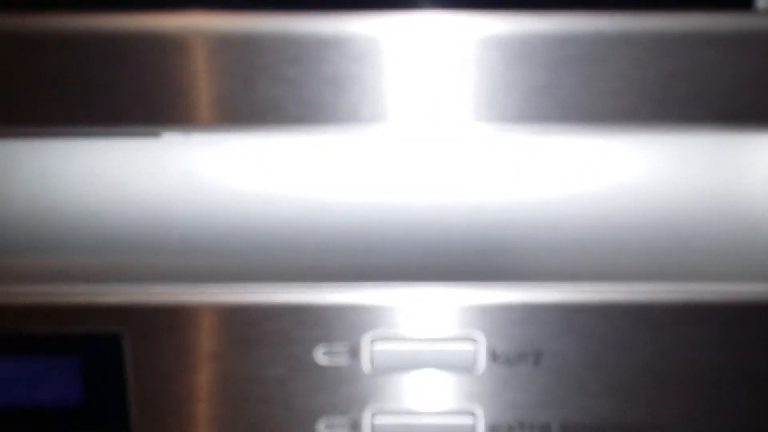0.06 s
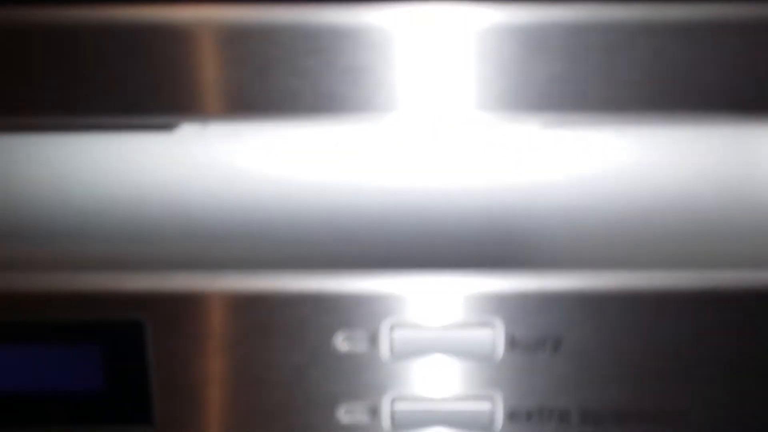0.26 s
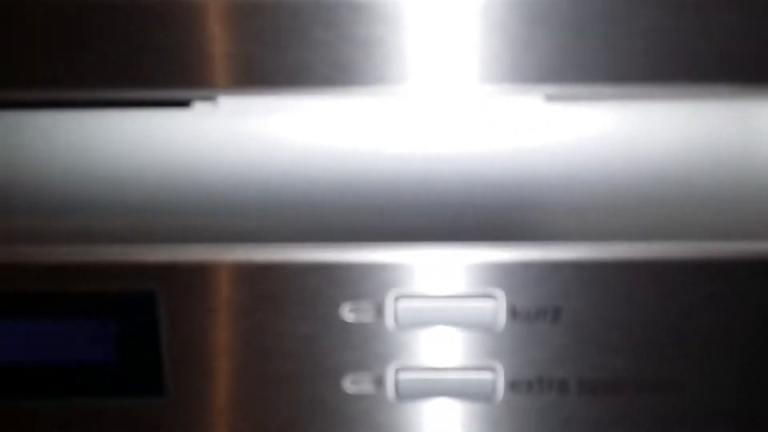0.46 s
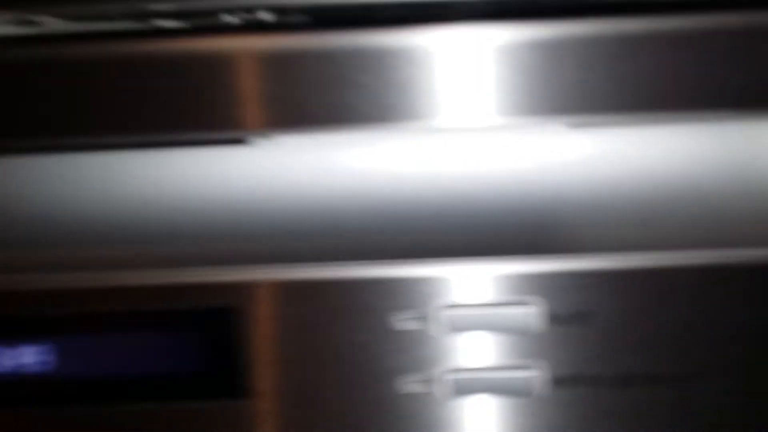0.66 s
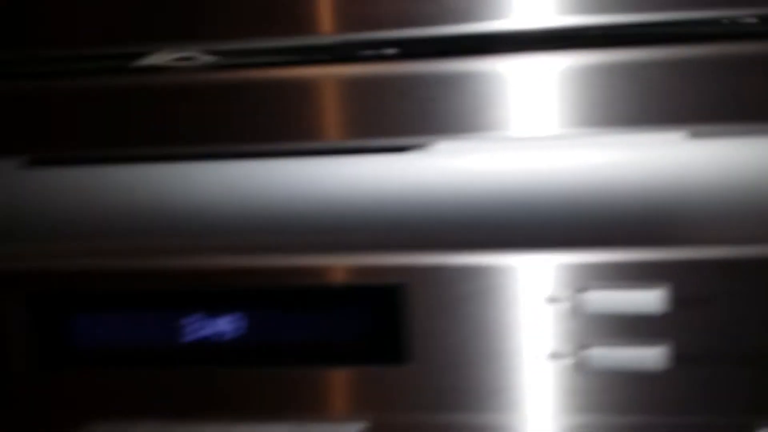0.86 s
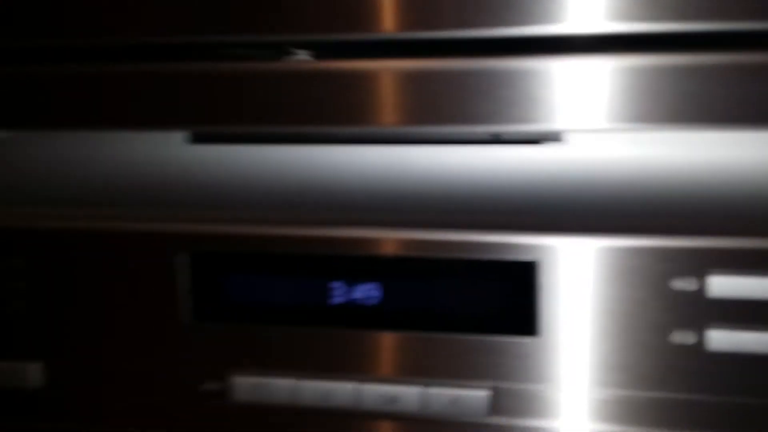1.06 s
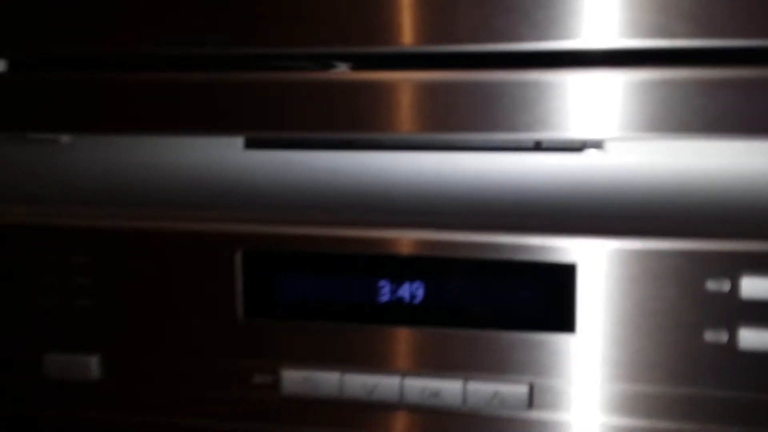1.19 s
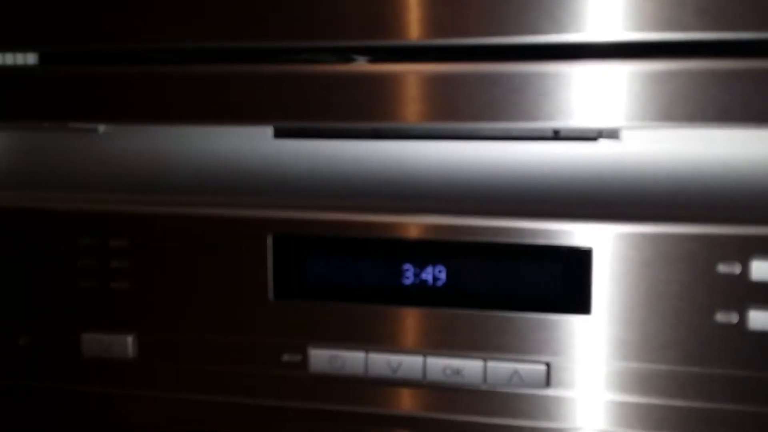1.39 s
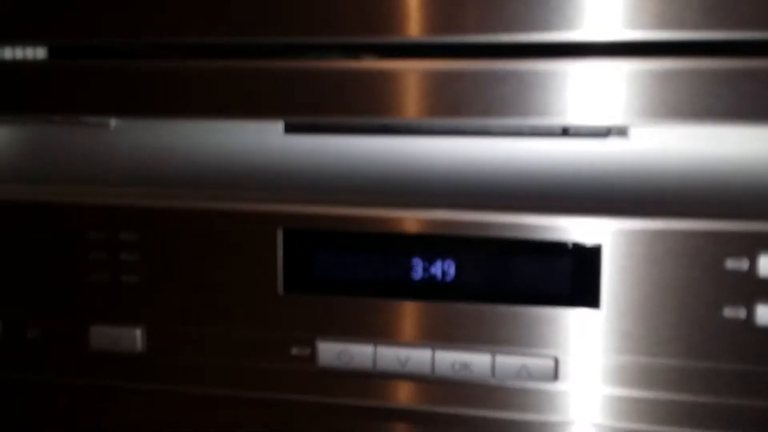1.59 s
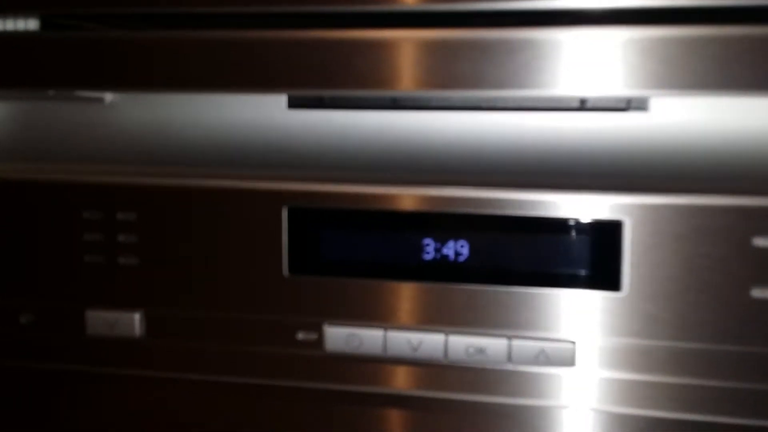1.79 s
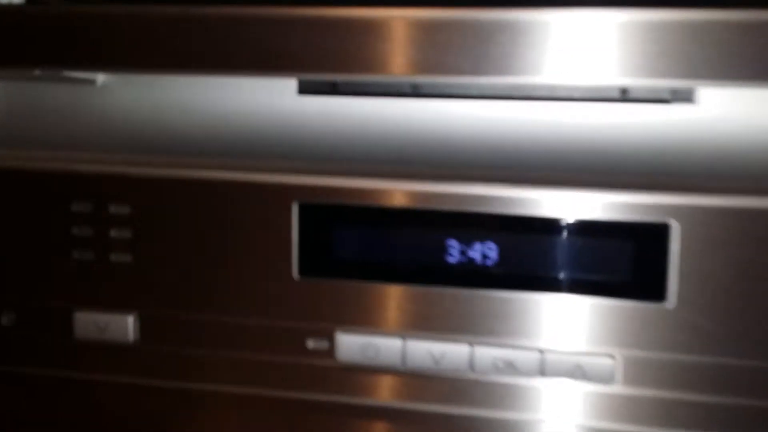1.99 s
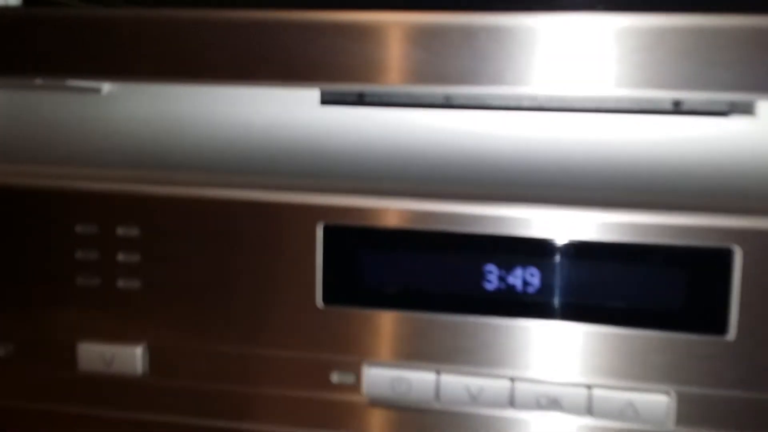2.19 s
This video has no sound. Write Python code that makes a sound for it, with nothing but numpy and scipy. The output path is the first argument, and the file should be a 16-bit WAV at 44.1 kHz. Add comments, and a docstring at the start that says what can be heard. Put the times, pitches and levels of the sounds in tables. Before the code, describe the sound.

A dishwasher door slams shut with a sharp latch snap and a short hollow metal boom.

```python
"""Dishwasher door pushed shut

A door closes near two microphones: filtered noise makes the seal rub and the latch grind, and short noise bursts
and brief tones make the latch tick, snap and slam. Ringing tones and resonant noise make the steel panel boom and
shudder, and a small kitchen answers. Later a low hum of wandering tones swells softly now and then.
Shaped noise adds a faint room rumble, a band near 1 kHz, microphone hiss, and a narrow hiss mostly on the left."""
import sys
import numpy as np
from scipy import signal
from scipy.fft import rfft, irfft, next_fast_len
from scipy.io import wavfile
from scipy.ndimage import map_coordinates

SR = 44100
rng = np.random.default_rng(int(sys.argv[2]) if len(sys.argv) > 2 else 0)


def undo_db(level):
    """Turn decibels back into plain size, where 20 dB means ten times bigger."""
    steps = np.asarray(level, float) / 20
    return 10 ** steps


def transcribe(signal):
    """Save signal, clipped to [-1, 1], as a 16-bit WAV file at the path in sys.argv[1]."""
    frames = np.atleast_2d(signal).T
    limited = np.clip(frames, -1, 1)
    pcm = np.round(limited * 32767).astype(np.int16)
    wavfile.write(sys.argv[1], SR, pcm)


N = 99225  # samples, 2.25 s
PADDED = next_fast_len(N + SR // 2)  # spare room so that filtered sounds can die away
HZ = np.fft.rfftfreq(PADDED, 1 / SR)  # the frequencies at which filters are drawn
LEFT_LAG_S = 0.00025  # the latch reaches the left microphone this much later


def unit(x):
    """Scale to rms 1."""
    return x / np.sqrt(np.mean(x ** 2) + 1e-20)


def along(points, hz):
    """Read a curve of (Hz, value) points on a logarithmic frequency axis."""
    point_hz, value = np.transpose(points)
    return np.interp(np.log(hz + 1), np.log(point_hz + 1), value)


def level(rows):
    """Gain for every sample from (seconds, dB) rows."""
    seconds, db = np.transpose(rows)
    return undo_db(np.interp(np.arange(N) / SR, seconds, db))


def left_right(db):
    """Left and right gains that make the left louder than the right by db."""
    return undo_db(np.array([[db], [-db]]) / 2)


def wobble(rate):
    """A smooth random curve through rate random points a second (400 at most)."""
    knots = rng.standard_normal(N // 100 + 4)
    return map_coordinates(knots, [np.arange(N) * min(rate, 400) / SR])


def filtered(x, response):
    """Shape the spectrum of x by a response given on HZ."""
    return irfft(rfft(x, PADDED) * response, PADDED)[..., :N]


def resonances(rows):
    """Sum of resonances from (Hz, width in Hz, dB) rows, with alternating signs."""
    total = 0
    for k, (centre, width, db) in enumerate(rows):
        peak = 1j * HZ * width / (centre * centre - HZ * HZ + 1j * HZ * width)
        total = total + (-1) ** k * undo_db(db) * peak
    return total


def noise(colour, alike):
    """Stereo noise of rms 1; alike is the left-right likeness, 1 for identical and 0 for unrelated."""
    mid, side = filtered(rng.standard_normal((2, N)), undo_db(along(colour, HZ)))
    turn = np.arccos(np.clip(alike, -1, 1)) / 2
    mid, side = np.cos(turn) * mid, np.sin(turn) * side
    return unit(np.array([mid + side, mid - side]))


def grains():
    """Fast random gain changes that make a friction sound grainy."""
    depth_db, grains_per_s = 4.5, 330
    return undo_db(depth_db * wobble(grains_per_s))


def background():
    """Wavering low rumble, a faint mid band and hisses, each a shaped noise under its own level."""
    # Colours. Each row: frequency in Hz, relative strength in dB per Hz.
    rumble_colour = [(18, -58.5), (30, 5), (200, -3), (240, -2.5), (344, -5.5), (469, -5), (779, -16.5),
                     (1500, -22.5), (1950, -39.5), (3300, -120)]
    hiss_colour = [(300, -120), (600, 2.5), (2000, 1.5), (5000, -1.5), (9000, -5.5), (12000, -3.5),
                   (14300, -3), (14800, -35), (16000, -120)]
    left_hiss_colour = [(2500, -120), (3500, -19.5), (4800, -11), (5800, -8), (6800, -0.5), (7500, -6.5),
                        (8300, -16.5), (10000, -20.5), (14500, -24), (15000, -120)]
    mid_band_colour = [(600, -120), (800, -13), (950, -4.5), (1150, -6.5), (1400, -18.5), (1800, -120)]
    # Levels before any wavering or left-right gain. Each row: time in seconds, level in dB.
    rumble_level = [(0, -70), (.5, -77.5), (.75, -73), (.95, -67.5), (1.1, -76), (1.4, -73.5), (1.72, -76),
                    (1.97, -85), (2.25, -74)]
    hiss_level = [(0, -68), (.2, -74.5), (.45, -66), (.7, -74.5), (1.2, -73), (2.25, -78)]
    left_hiss_level = [(0, -59.5), (.05, -62.5), (.2, -62), (.33, -55.5), (.45, -54), (.55, -59.5),
                       (.75, -64.5), (.9, -61), (1.2, -63), (1.6, -64.5), (2.25, -64.5)]
    mid_band_level = [(.9, -100), (1.02, -77), (1.2, -85), (1.45, -82), (1.6, -100)]
    rumble_waver_db, left_waver_db = 2, 0.5
    rumble = level(rumble_level) * undo_db(rumble_waver_db * wobble(8)) * noise(rumble_colour, 0.406)
    left_hiss = level(left_hiss_level) * undo_db(left_waver_db * wobble(14)) * noise(left_hiss_colour, 0)
    left_hiss = left_hiss * undo_db([[0], [-24]])  # 24 dB weaker on the right
    mid_band = level(mid_band_level) * noise(mid_band_colour, 0.26)
    hiss = level(hiss_level) * noise(hiss_colour, 0)
    return rumble + left_hiss + mid_band + hiss


def seal():
    """Rubber rubbing on steel as the door meets it and settles: grainy noise, stronger on the right."""
    # Rubbing strength before graining and left-right gain. Each row: time in seconds, level in dB.
    rub_level = [(0, -68.5), (.05, -100), (.16, -94), (.19, -66.5), (.21, -55.5), (.228, -54.5),
                 (.245, -36.5), (.27, -35.5), (.31, -50), (.38, -59.5), (.48, -66.5), (.53, -82), (.7, -95),
                 (2.25, -100)]
    # Colour of the rubbing. Each row: frequency in Hz, relative strength in dB per Hz.
    rub_colour = [(240, -33.5), (400, -12), (700, -4.5), (1400, -1), (2200, -2), (3600, -14), (4500, -18.5),
                  (8000, -27), (12000, -40.5), (15000, -66.5)]
    return level(rub_level) * grains() * noise(rub_colour, 0.9) * left_right(-4.2)


def panel():
    """Half-sine blows ring the steel panel's modes; a rough push keeps them shuddering."""
    # Blows on the panel. Each row: start in seconds, level in dB before the ringing, contact in seconds.
    blows = [(0.233, -43.5, 0.002), (0.2475, -29.5, 0.0015), (.255, -26, 0.00039), (.264, -29.5, 0.0014),
             (.28, -22.5, 0.0009), (0.2902, -38.5, 0.003), (0.31, -32, 0.0022), (0.458, -48.5, 0.0013),
             (0.472, -61, 0.0017), (0.546, -57, 0.0015), (0.688, -61.5, 0.0036), (1.861, -73.5, 0.0017)]
    # Modes of the panel. Each row: frequency in Hz, relative level in dB, time to fade by 60 dB in seconds.
    modes = [(54.7, 9, 0.24), (83.2, -7, 0.35), (119.1, -7, 0.16), (164.9, 3.5, 0.094), (252.8, -3, 0.22),
             (298.4, -6.5, 0.15), (368, -4.5, 0.19), (458, -6, 0.25), (500, -9.5, 0.16), (613, -11, 0.14),
             (773.3, -17.5, 0.033), (868, -24, 0.27), (975.2, -29.5, 0.93)]
    # Shudder as the door swings and settles, before flutter and pan. Each row: time in seconds, level in dB.
    shudder_level = [(0, -57.5), (.09, -72), (.17, -72.5), (.2, -56.5), (.24, -46.5), (.255, -29.5),
                     (.29, -29.5), (.33, -35.5), (.4, -45.5), (.49, -51), (.525, -62), (.65, -75),
                     (.78, -79), (.86, -60.5), (.97, -76.5), (1.1, -86), (2.25, -75)]
    scatter_db, flutter_db, pan_db = 1.5, 1.5, -3
    wider_hz, low_hz = 16.6, 127.1  # shudder: extra width of each mode, and where its bass starts to fade
    out, t = np.zeros(N + SR), np.arange(SR // 2) / SR
    for start, db, contact in blows:
        ring = 0
        for (hz, mode_db, t60), change_db in zip(modes, rng.normal(0, scatter_db, len(modes))):
            ring = ring + undo_db(mode_db + change_db - 60 * t / t60) * np.sin(2 * np.pi * hz * t)
        # a longer contact rounds the blow and dulls the ring
        push = np.sin(np.pi * np.clip(t[:400] / contact, 0, 1))
        blow = signal.fftconvolve(ring, push / push.sum())[:len(t)]
        out[round(start * SR):][:len(t)] += undo_db(db) * blow
    response = resonances([(hz, 3.4 / t60 + wider_hz, mode_db) for hz, mode_db, t60 in modes])
    response = response * (1j * HZ / (low_hz + 1j * HZ)) ** 2
    shudder = unit(filtered(rng.standard_normal(N), response))
    shudder = shudder * level(shudder_level) * undo_db(flutter_db * wobble(22))
    return (out[:N] + shudder) * left_right(pan_db)


def grind():
    """The latch grinds through its travel: bright, grainy friction noise between the contacts."""
    # Grinding strength before graining. Each row: time in seconds, level in dB.
    grind_level = [(.19, -90), (.215, -61.5), (.235, -49), (.245, -55.5), (.256, -39.5), (.28, -48.5),
                   (.3, -54.5), (.34, -67), (.42, -94)]
    # Colour of the grinding. Each row: frequency in Hz, relative strength in dB per Hz.
    grind_colour = [(2000, -120), (3000, -4.5), (5000, -0.5), (8000, -3), (11000, -14), (14000, -17.5),
                    (15200, -120)]
    return level(grind_level) * grains() * noise(grind_colour, 0.19)


def latch():
    """Each contact is a noise burst: a knock through the catch and a shorter treble crack, later on the left."""
    # Latch contacts, then faint later ticks, before the resonances. Each row: start in seconds, knock level
    # in dB, crack level in dB, left over right in dB, time for the knock to fade by 60 dB in seconds.
    contacts = [(0.2204, -46, -43, -16, 0.11), (0.2338, -29, -28, -2.5, 0.047),
                (0.2488, -21.5, -26, -18, .03), (0.2526, -14.5, -16.5, -2, 0.021),
                (0.2566, -18.5, -27, 5, .02), (.2611, -19, -37, -2, 0.022), (0.272, -29, -19.5, -2, .03),
                (0.2785, -19, -37, -5, 0.045), (0.305, -31, -53.5, -2, .03), (.474, -52.5, -60, -3, 0.046),
                (0.4817, -42, -40, -1.5, 0.016), (0.831, -61, -80, -7, 0.014), (1.809, -66, -67, -2, 0.051),
                (1.822, -67, -63.5, -5, .12)]
    # Resonances for the knock, then for the crack. Each row: frequency in Hz, width in Hz,
    # left level in dB, right level in dB.
    knock_resonances = [(1376, 2000, -2.5, 6.5), (1840, 140, -10.5, 15), (2400, 750, 2, 10),
                        (3830, 1500, -15, -9.5)]
    crack_resonances = [(4600, 1600, 5, -8), (7350, 1500, 3, -2.5), (8313, 1300, -22.5, -1),
                        (11000, 1200, -15.5, -11.5), (14200, 640, -7, -12.5)]
    knock_top_hz, rise_s, crack_faster = 5300, 0.00035, 0.94  # crack_faster multiplies the fade time
    out, t = np.zeros((2, 2, N + SR)), np.arange(SR // 5) / SR  # first axis knock and crack, then left and right
    for start, knock_db, crack_db, pan_db, t60 in contacts:
        # a part shared by both sides, and a weaker part of each side's own
        burst = rng.standard_normal((2, 1, len(t))) + .5 * rng.standard_normal((2, 2, len(t)))
        burst *= 1 - np.exp(-t / rise_s)
        knock_fade = knock_db - 60 * t / t60
        crack_fade = crack_db - 60 * t / (t60 * crack_faster)
        fade = undo_db(np.array([knock_fade, crack_fade])[:, None])
        out[..., round(start * SR):][..., :len(t)] += fade * left_right(pan_db) * burst
    # half the lag delays the left, half brings the right forward
    lag = np.exp(np.outer([-1j, 1j], np.pi * HZ * LEFT_LAG_S))

    def both_sides(rows):
        """Resonances as each microphone hears them."""
        left = resonances([(hz, width, left_db) for hz, width, left_db, _ in rows])
        right = resonances([(hz, width, right_db) for hz, width, _, right_db in rows])
        return lag * np.array([left, right])

    dull = 1 / (1 + 1j * HZ / knock_top_hz) ** 2
    knock = filtered(out[0, :, :N], both_sides(knock_resonances) * dull)
    crack = filtered(out[1, :, :N], both_sides(crack_resonances))
    return knock + crack


def snaps():
    """Sharp strikes of the catch: each tone swells and dies within a few cycles, later on the left."""
    # Each row: start in seconds, level in dB, frequency in Hz, left over right in dB.
    strikes = [(.2219, -45, 2336, -8.5), (.2365, -33, 1892, -6), (0.2523, -13.5, 3654, -1.5),
               (0.2546, -17.5, 2777, -2), (0.2562, -4.5, 2213, -7.5), (0.2591, -22, 2600, -5.5),
               (0.2622, -15, 2300, -7), (0.2635, -22, 2020, -6), (0.2677, -20.5, 1900, -6),
               (0.2775, -18.5, 1487, -4.5), (0.2838, -23.5, 2480, -3.5), (0.3047, -34, 3800, -4)]
    peak_cycles = 1.2  # cycles from the start to the loudest point
    out, t = np.zeros((2, N + SR)), np.arange(SR // 50) / SR
    for start, db, hz, pan_db in strikes:
        cycles = np.maximum(t - np.array([[LEFT_LAG_S], [0]]), 0) * hz
        swell = (cycles / peak_cycles * np.exp(1 - cycles / peak_cycles)) ** 2
        tone = np.sin(2 * np.pi * (cycles + rng.random()))
        out[:, round(start * SR):][:, :len(t)] += undo_db(db) * left_right(pan_db) * swell * tone
    return out[:, :N]


def kitchen(x):
    """The room's answer is a tail of noise in which each frequency dies at its own speed."""
    # How long the kitchen rings. Each row: frequency in Hz, time to fade by 60 dB in seconds.
    ring_time = [(200, 0.26), (1000, 0.24), (2500, 0.093), (4000, 0.11), (6000, 0.17), (10000, 0.1),
                 (14000, .05)]
    hz, t, spectrum = signal.stft(rng.standard_normal((2, SR // 2)), SR, nperseg=256)
    fade = undo_db(-60 * t / along(ring_time, hz)[:, None])
    tail = signal.istft(spectrum * fade, SR, nperseg=256)[1]
    tail = tail / np.linalg.norm(tail[0])
    source = np.pad(x.mean(0), (200, 0))[None]  # the answer starts 200 samples late
    return signal.fftconvolve(source, tail, axes=1)[:, :N]


def hum():
    """A low hum that comes and goes: sine tones whose pitch wanders, under one level."""
    # Strength of the whole hum. Each row: time in seconds, level in dB.
    hum_level = [(.75, -90), (.81, -66), (.875, -58.5), (.91, -76), (.95, -66), (1.02, -78), (1.2, -86.5),
                 (1.6, -87), (1.65, -77), (1.685, -73.5), (1.73, -69), (1.79, -85.5), (2.25, -91.5)]
    # The tones. Each row: multiple of the pitch, size of the wander in Hz, relative level in dB.
    tones = [(1, 2.7, 3.5), (3.2, 20, -14), (4.6, 15, -6.5)]
    # Base pitch before multiplying and wandering. Each row: time in seconds, frequency in Hz.
    pitch_path = [(.8, 99.7), (0.869, 110), (1.001, 105), (1.65, 127.5), (1.76, 118.8)]
    pitch = np.interp(np.arange(N) / SR, *np.transpose(pitch_path))
    total = np.zeros(N)
    for multiple, wander_hz, db in tones:
        tone_hz = multiple * pitch + wander_hz * wobble(19)
        total += undo_db(db) * np.sin(2 * np.pi * np.cumsum(tone_hz) / SR)
    return level(hum_level) * unit(total)


def scene():
    """Door, kitchen, hum and background added together."""
    clicks, boom = latch() + snaps(), panel()
    clicks_to_kitchen_db, boom_to_kitchen_db = -12, -17.5
    answer = kitchen(undo_db(clicks_to_kitchen_db) * clicks + undo_db(boom_to_kitchen_db) * boom)
    return background() + seal() + boom + grind() + clicks + answer + hum()


def top_cut(x):
    """Nothing passes above the cut-off."""
    return signal.sosfilt(signal.butter(12, 15550, fs=SR, output="sos"), x)


def record(dry):
    """The microphones lose the deepest bass and the highest treble, and add a small constant offset."""
    low_hz, top_hz, offset = 44, 14500, -.0002
    low = 1j * HZ / low_hz
    bass_cut = (low ** 2 / (1 + 1.52 * low + low ** 2)) ** 2
    treble_cut = 1 / np.sqrt(1 + (HZ / top_hz) ** 60)
    mix = filtered(dry, bass_cut * treble_cut) + offset
    return top_cut(mix)


dry = scene()
out = record(dry)
transcribe(out)
```